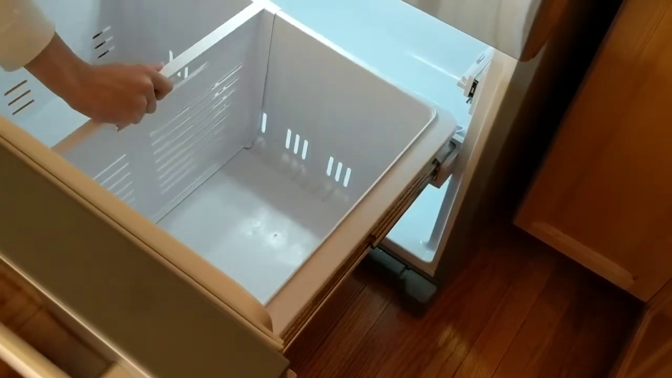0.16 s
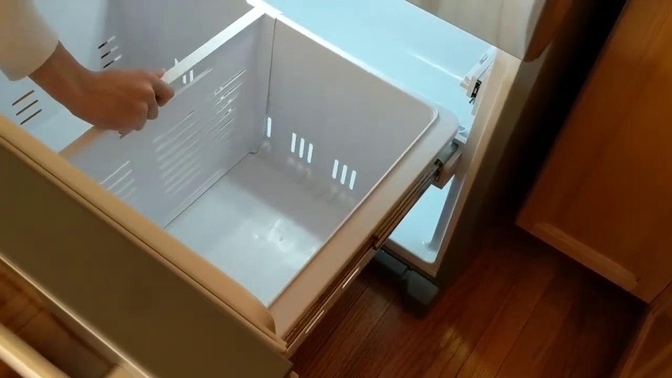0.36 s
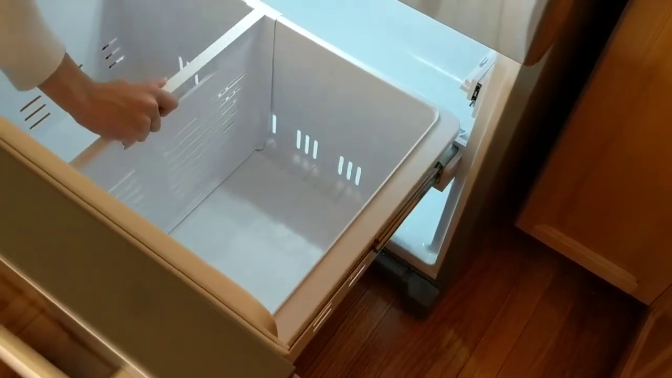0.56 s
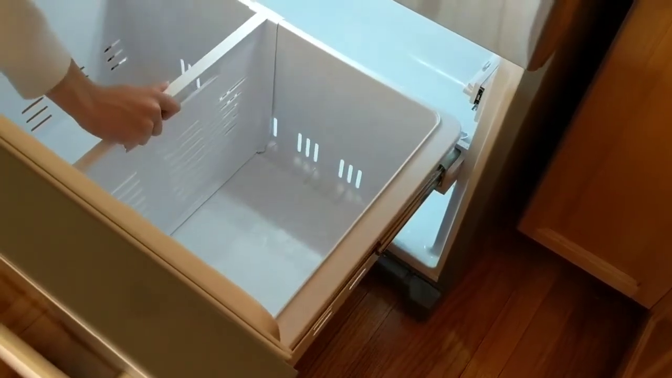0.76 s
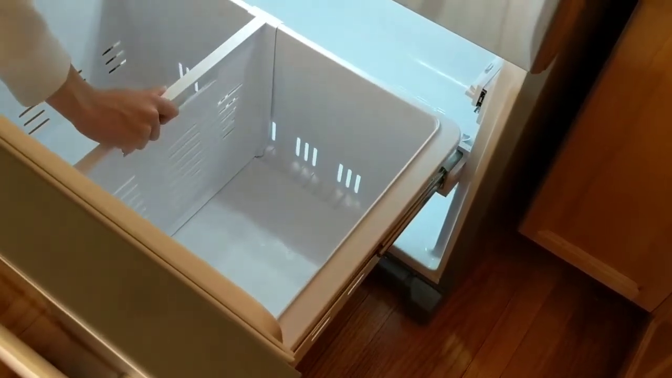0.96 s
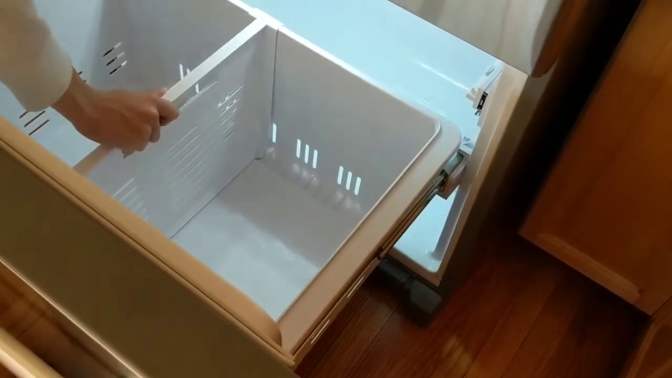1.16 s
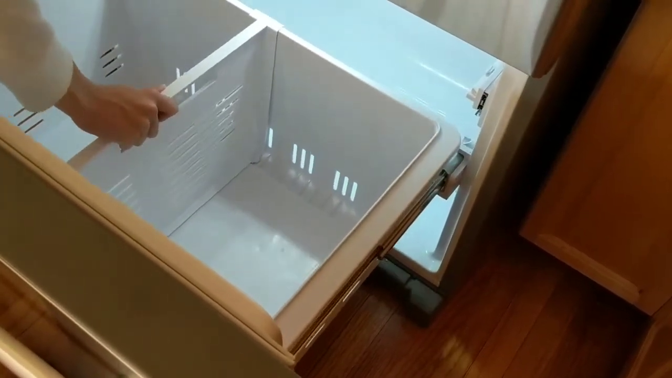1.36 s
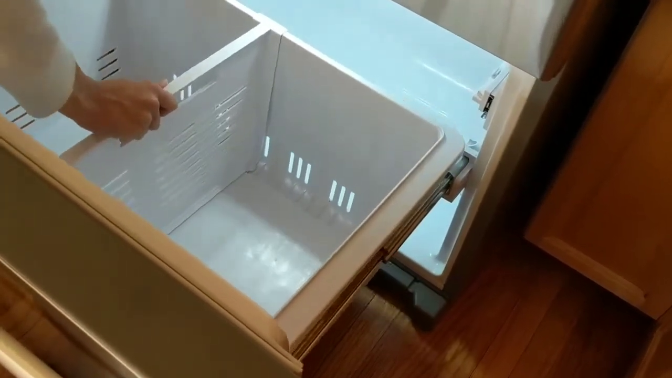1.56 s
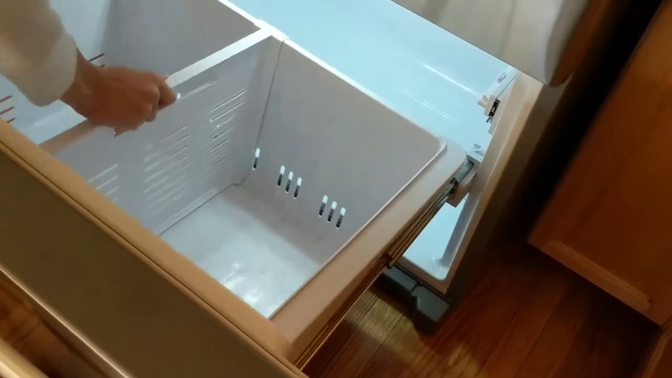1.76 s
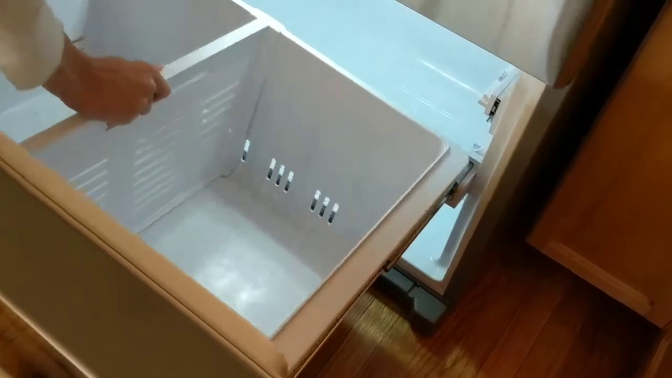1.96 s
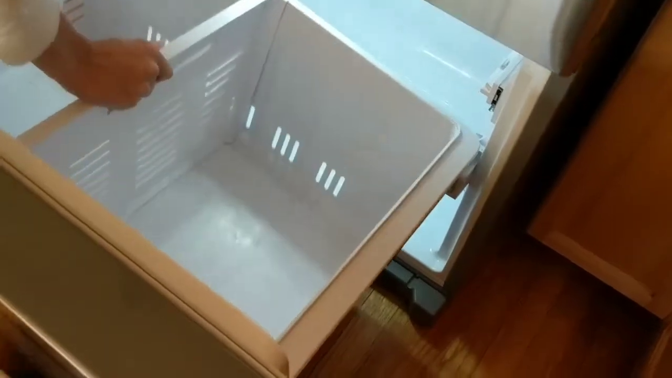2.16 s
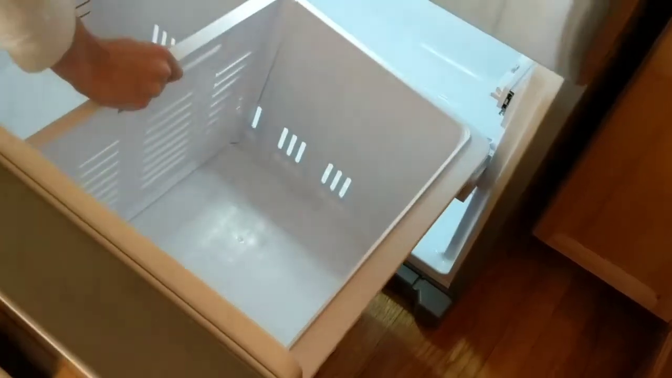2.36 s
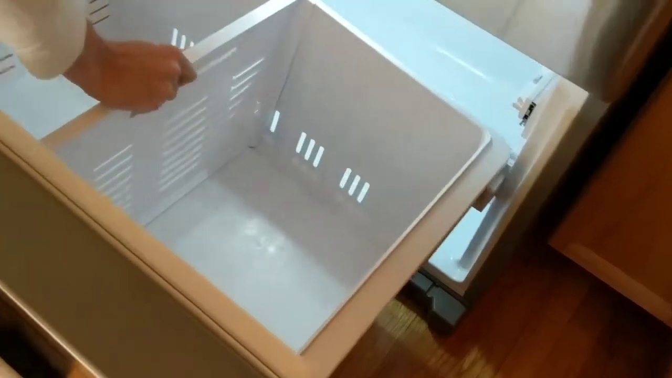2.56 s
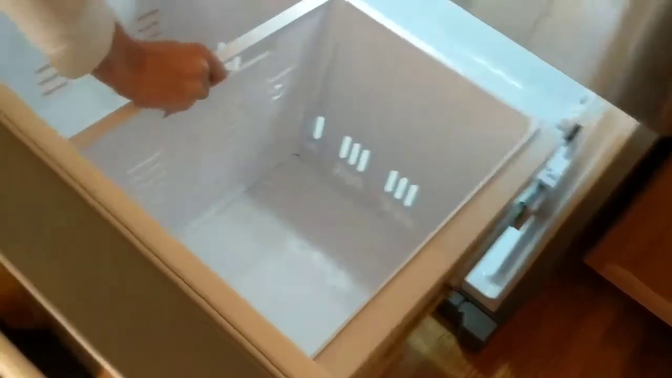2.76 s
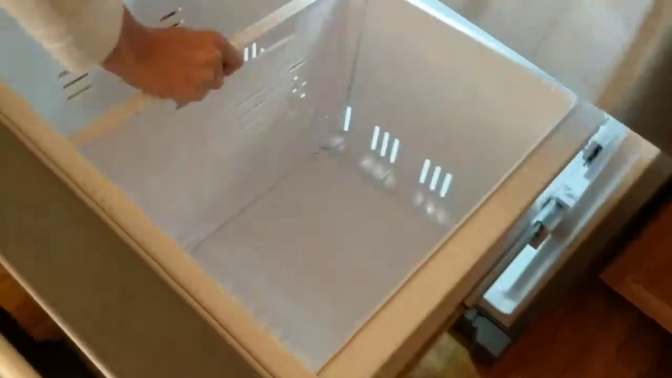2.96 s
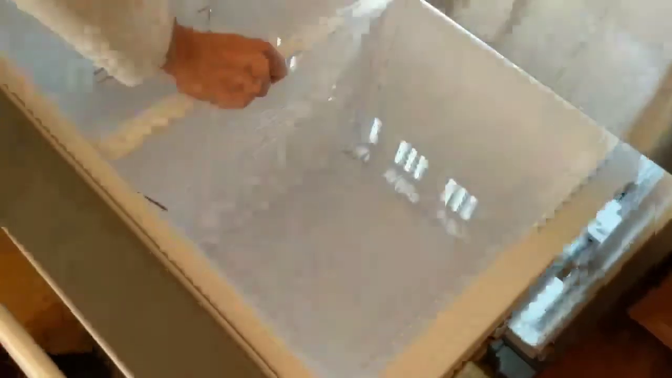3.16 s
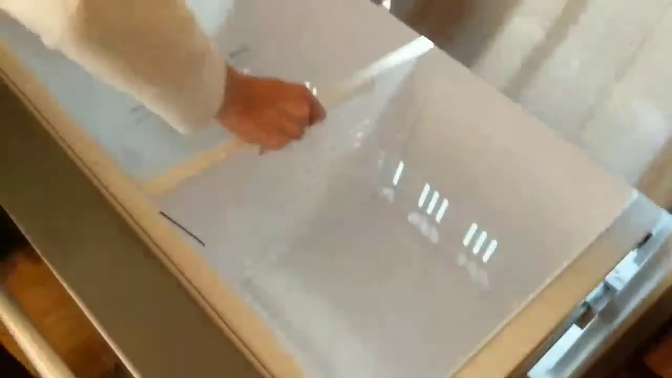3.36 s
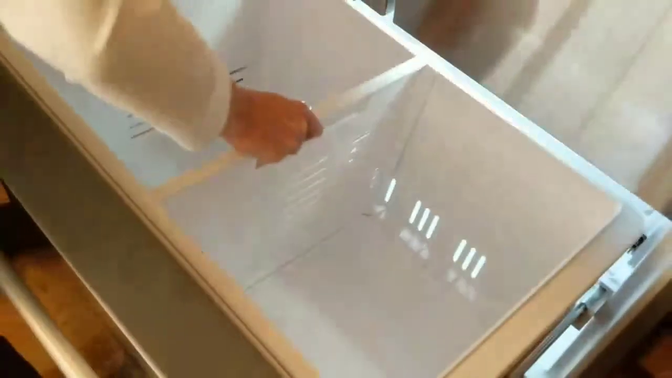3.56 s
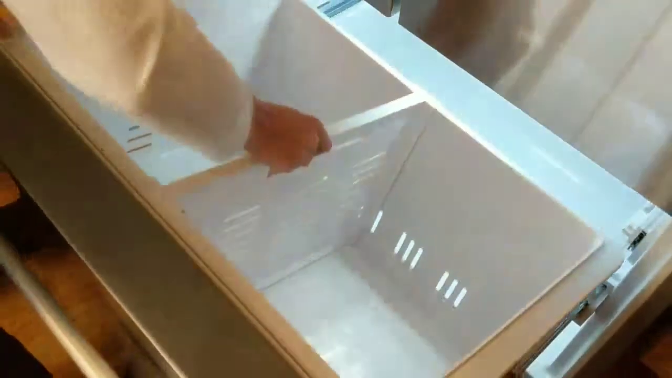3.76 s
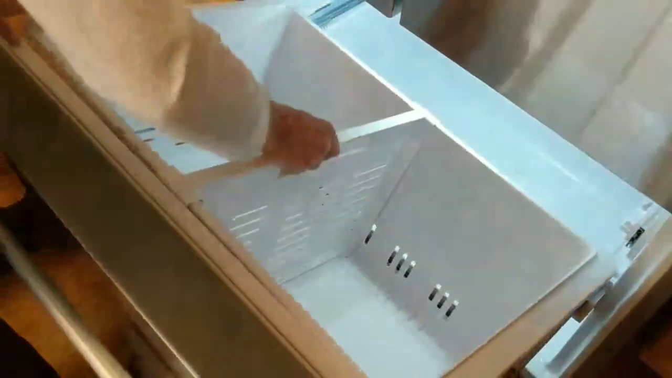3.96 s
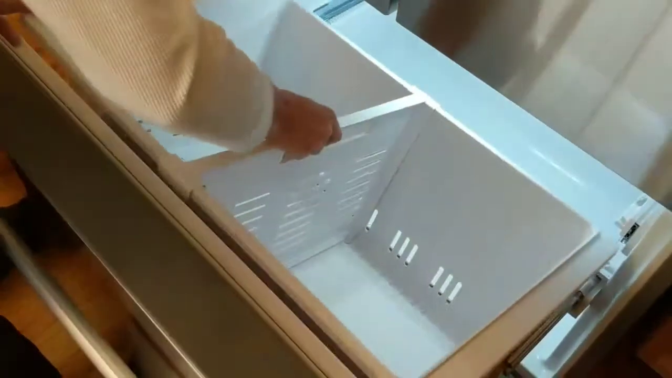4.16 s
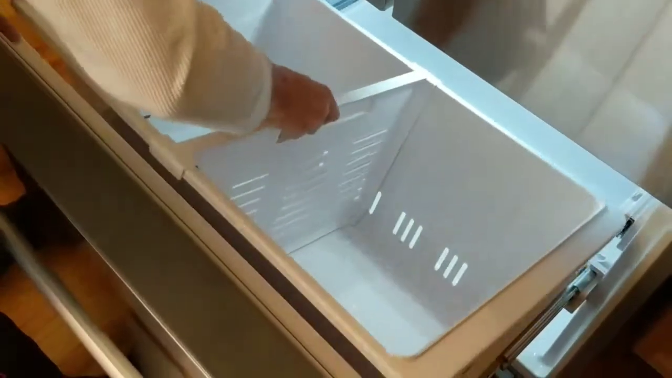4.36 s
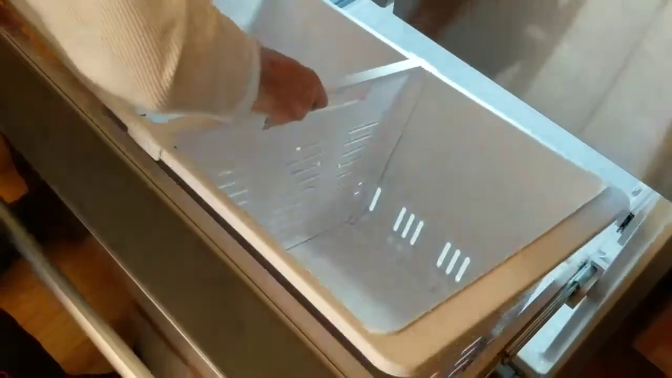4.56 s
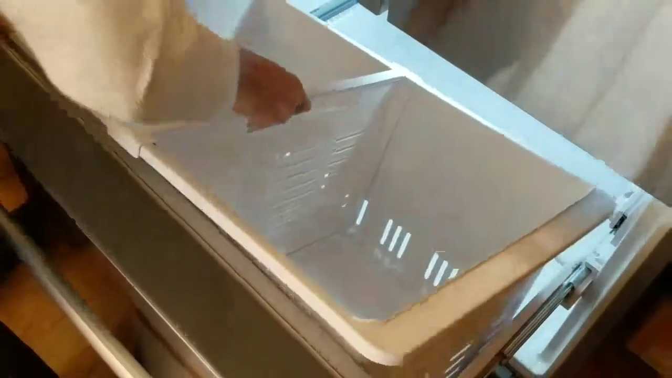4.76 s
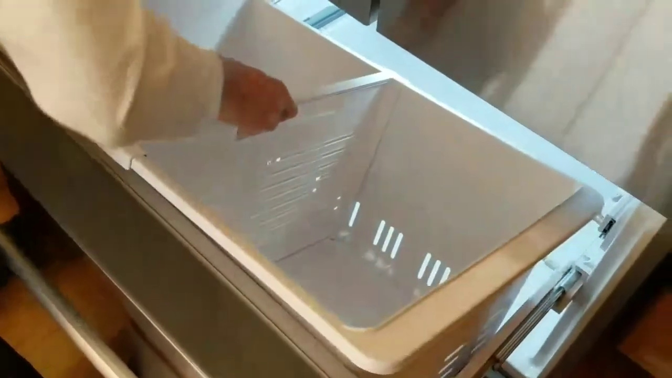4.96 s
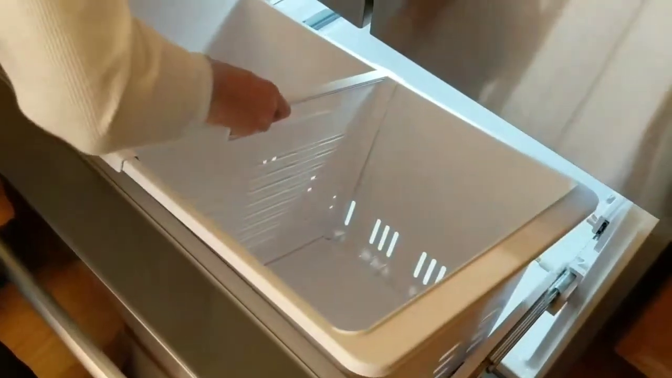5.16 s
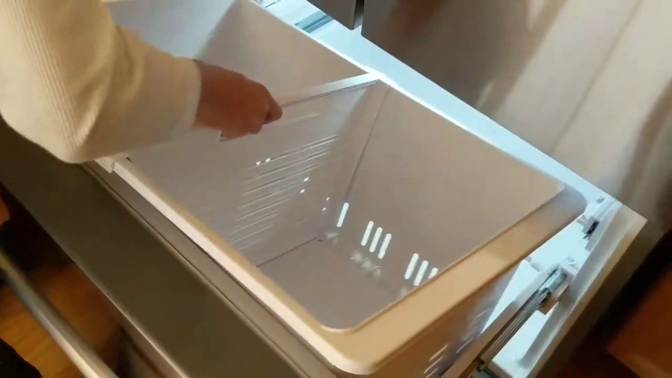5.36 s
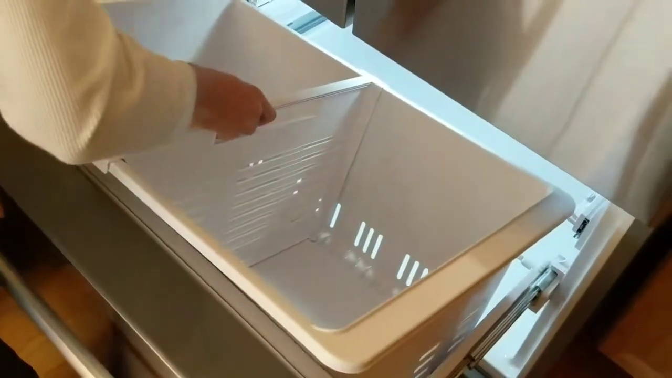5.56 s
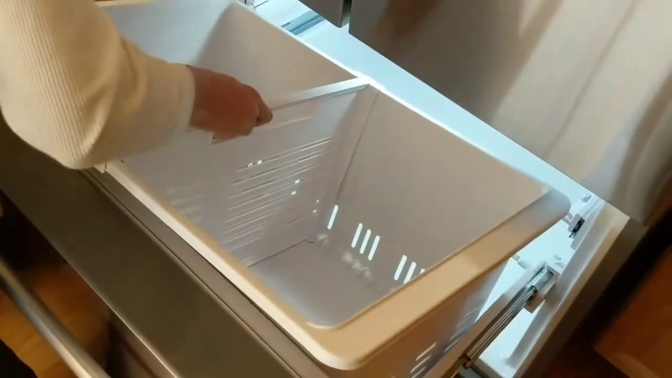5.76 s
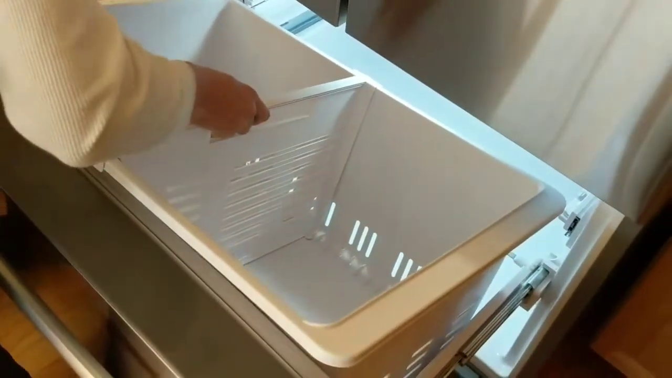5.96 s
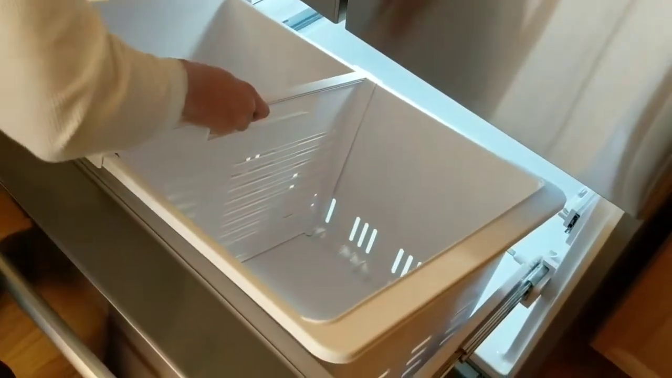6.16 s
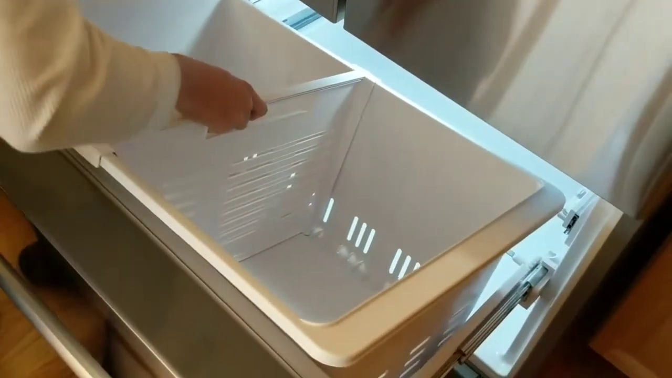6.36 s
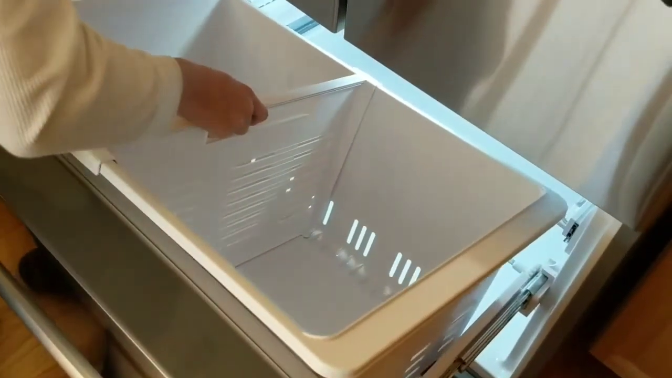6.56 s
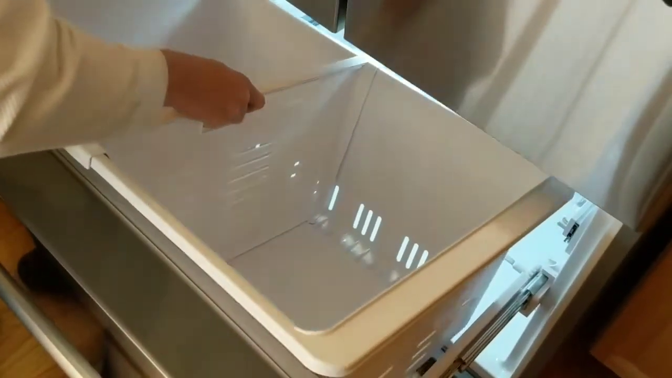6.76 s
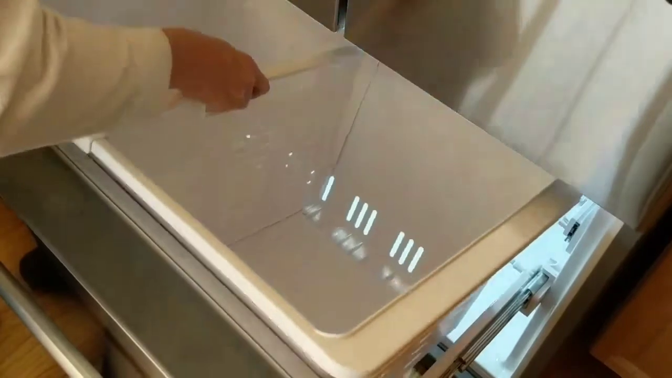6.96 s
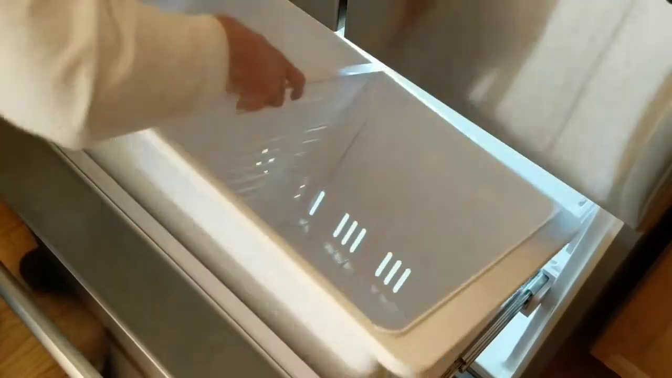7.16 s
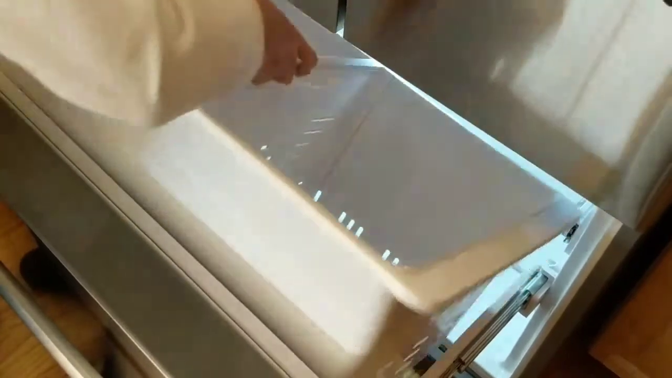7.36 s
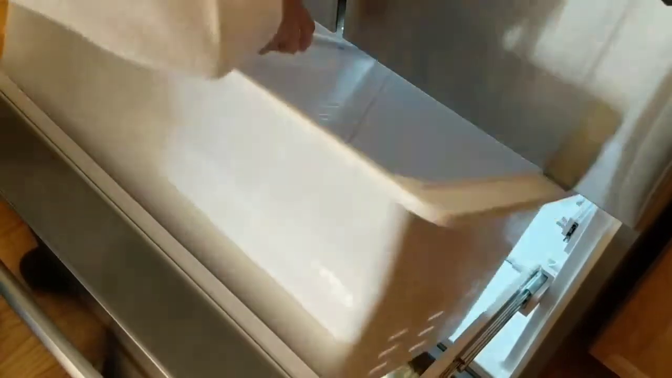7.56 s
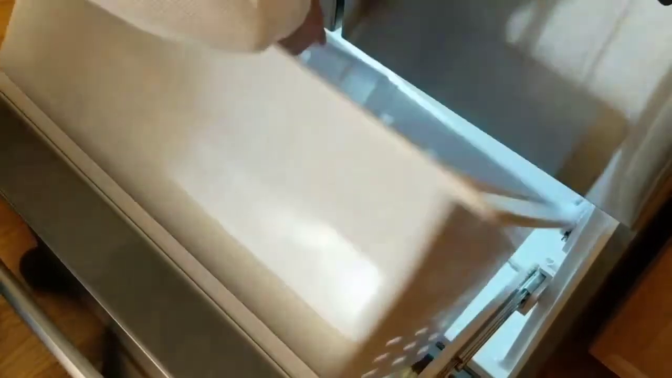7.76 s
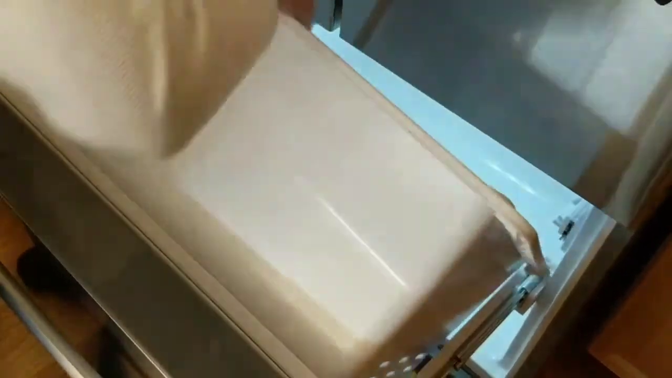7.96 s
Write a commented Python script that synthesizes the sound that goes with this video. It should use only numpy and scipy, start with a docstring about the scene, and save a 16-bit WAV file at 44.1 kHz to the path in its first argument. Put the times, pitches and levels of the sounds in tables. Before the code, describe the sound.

A hollow plastic freezer basket knocks, clacks and rattles against its drawer frame, then thumps and scrapes free, over a faint freezer hum.

```python
"""Kitchen: a plastic freezer basket is jiggled in its drawer frame and finally dragged up and out.
Rim contacts clack as filtered noise; walls, panels and drawer knock as damped modes.
Between them the rim rattles and scrapes along the frame as random jerks through the plastic's resonances.
The freezer hums underneath as wavering sines over filtered noise; the room adds decaying noise echoes."""
import sys
import numpy as np
from scipy import signal
from scipy.fft import rfft, irfft, next_fast_len
from scipy.io import wavfile
from scipy.ndimage import uniform_filter1d, map_coordinates

SR = 44100
rng = np.random.default_rng(int(sys.argv[2]) if len(sys.argv) > 2 else 0)


def store_wav(level_fs):
    """Save 16-bit WAV to argv[1]."""
    pcm = np.round(np.clip(np.atleast_2d(level_fs), -1, 1) * 32767)
    wavfile.write(sys.argv[1], SR, pcm.T.astype(np.int16))


N = 356901

# All table levels are relative: layer trims follow.
# Rim hits frame: (time [s], clack [dB], snap re clack [dB], favoured pitch [Hz], wall knock [dB])
RIM_CONTACTS = [(0.097, -39, -12.5, 807, -31), (0.29, -45.5, -23, 970, -52),
                (0.329, -30.5, -7, 1330, -19.5), (0.573, -49, -11.5, 1270, -41.5),
                (0.715, -44.5, -11, 1680, -32.5), (1.549, -49, -15.5, 1180, -38),
                (1.813, -45, -18, 750, -32), (1.834, -43, -7.5, 830, -52), (1.911, -36.5, -4.5, 980, -30),
                (1.932, -32.5, -15, 780, -24), (2.339, -44, -5.5, 1690, -36.5), (2.39, -44, -22, 850, -40),
                (2.483, -45, -16.5, 830, -41), (2.63, -49.5, -8, 1650, -40.5),
                (2.72, -40.5, -4, 1480, -29.5), (2.844, -42, -11.5, 820, -29.5),
                (2.918, -49, -7, 810, -28.5), (2.957, -41, -7, 1050, -31.5), (3.097, -48, -17, 840, -38),
                (3.552, -43.5, -12, 1170, -41.5), (3.644, -48.5, -10.5, 1010, -45.5),
                (4.024, -47, -8, 1010, -45), (4.045, -38.5, -7.5, 2030, -30),
                (4.053, -36.5, -10, 2200, -33), (4.233, -44.5, -9.5, 1090, -37.5),
                (4.295, -44.5, -11.5, 970, -40), (4.437, -34.5, -9.5, 1460, -23.5),
                (4.496, -33.5, -12, 1550, -26), (4.624, -40.5, -16, 1580, -34),
                (5.057, -57, -14, 950, -53.5), (5.308, -44.5, -10, 1230, -29.5),
                (5.331, -44, -11, 1010, -38.5), (6.251, -45, -10, 1310, -39.5),
                (6.663, -46, -13, 1060, -43.5), (6.704, -45, -9, 1180, -37), (6.79, -39.5, -21, 706, -33),
                (6.872, -39.5, -10, 1670, -36.5), (7.013, -55, 3.5, 2030, -38),
                (7.354, -43, -25, 1020, -29), (7.404, -39.5, -12.5, 1530, -21),
                (7.435, -40, -20, 1210, -29), (7.546, -37, -25, 980, -19), (7.563, -35.5, -14, 1280, -27.5),
                (7.65, -36, 1, 950, -24), (7.661, -39, -4, 985, -30), (7.747, -42, -21, 910, -30),
                (7.976, -57.5, 7.5, 1050, -45.5)]
# Basket belly bumps drawer, no clack: (time [s], walls [dB], drawer boom [dB])
BELLY_BUMPS = [(0.001, -34.5, -34.5), (0.141, -31.5, -42), (0.379, -30, -36), (1.086, -43, -58),
               (1.6, -39, -44), (1.677, -39, -43), (2.357, -43, -31.5), (2.405, -44, -34),
               (2.751, -25.5, -38), (2.789, -32.5, -30.5), (2.948, -25.5, -31), (3.342, -44, -42.5),
               (3.473, -37.5, -40), (3.796, -44.5, -48), (4.653, -37.5, -35), (4.89, -46.5, -55),
               (5.388, -38, -55), (5.451, -43, -58), (6.334, -46.5, -50), (6.892, -33, -27),
               (6.949, -34.5, -39), (7.0, -34.5, -53), (7.599, -21, -38), (7.638, -31, -25),
               (7.794, -27.5, -32), (7.83, -27, -46), (8.003, -37, -31)]
# Rim slides along frame: (start [s], length [s], rasp [dB], hiss [dB])
RIM_SLIDES = [(0.328, 0.0043, -30, -30.5), (1.093, 0.15, -80, -68), (1.939, 0.15, -52, -50.5),
              (2.28, 0.034, -76, -56.5), (2.764, 0.2, -59.5, -80), (5.983, 0.1, -62, -57.5),
              (7.13, 0.029, -64, -52.5), (7.58, 0.062, -50, -55), (7.626, 0.036, -37, -39.5),
              (7.679, 0.2, -48, -60)]
# Rim resonances: (centre [Hz], width [Hz], level [dB])
RIM_RESONANCES = [(950, 30, -14), (1053, 43, -5.5), (1315, 41, -5.5), (1810, 120, -16), (3580, 410, -5.5)]
# Nominal modes of the steel slide rail: (frequency [Hz], level [dB], t60 [s])
RAIL_MODES = [(3350, -3, 0.16), (4520, -12, .2), (5400, -6, 0.095), (5400, -3, 0.16), (5250, 5, 0.092),
              (6120, 8, 0.16), (7250, -6, 0.13), (8720, 6, .15)]
# Nominal modes of basket walls, stiff panels, drawer: (frequency [Hz], level [dB], t60 [s])
WALL_MODES = [(136.8, -5, 0.24), (151.8, -3.5, 0.45), (174, 1, 0.13), (196, -1, 0.26), (214.8, -4.5, 0.24),
              (236.9, 0, 0.21), (265, -3, 0.23), (287.8, -5, 0.12)]
PANEL_MODES = [(339.4, 0, 0.11), (371.6, -3, 0.27), (406.3, -1, .22), (432.4, -6, 0.13), (494.8, -7, 0.16),
               (546.6, -7, 0.14), (605.7, -11, 0.21), (698, -16, 0.17)]
DRAWER_MODES = [(67, 0.5, 0.15), (74.74, -4, 0.29), (91.7, -9.5, 0.14)]
# Spectral colours of clack, snap, rasp, hiss, air rush: (frequency [Hz], gain [dB])
CLACK_COLOUR = [(150, -28), (400, 7), (750, 1.5), (1300, -0.5), (2200, 0), (2900, -10.5), (4500, -16.5),
                (8000, -66)]
SNAP_COLOUR = [(1200, -34), (2600, -20), (3700, 2), (4600, -5), (5800, 2), (7200, -3.5), (8800, 1.5),
               (9700, -9), (10800, -21.5), (15500, -41)]
RASP_COLOUR = [(150, -16), (400, 3), (1000, 5.5), (2100, 2.5), (2900, -20), (6000, -57)]
HISS_COLOUR = [(1500, 2), (3000, 6), (7200, -1), (8800, 3), (9700, -7), (10800, -35), (15500, -37)]
AIR_COLOUR = [(25, -32), (60, -37), (100, -19.5), (300, -24), (450, -29.5), (750, -35), (2100, -36.5),
              (3000, -41.5), (8700, -48), (10000, -54.5), (15600, -58)]
# Compressor and fan partials: (frequency [Hz], rms level before swell [dB])
HUM_PARTIALS = [(60, -51), (123.8, -68.5), (269.2, -74), (430.7, -72.5), (533, -81)]
# Hum swell: (time [s], gain [dB])
HUM_SWELL_CURVE = [(0, 6.5), (1.3, -0.5), (2.3, 3.5), (3.2, 3.5), (3.9, 0.5), (5.0, 1), (6.6, 0.5),
                   (7.15, 4), (7.3, -4.5), (8.09, 6.5)]
# Room decay: (frequency [Hz], t60 [s])
ROOM_DECAY = [(70, 0.53), (250, 0.69), (1500, 0.56), (5000, 0.44), (10000, 0.34)]

TOP_HZ = 15750  # band limit
SLIDE_ATTACK_SHARE, SLIDE_RELEASE_S = 0.55, 0.029  # 20 dB rise (share of slide length), 20 dB fall
WALL_LAG_S = 0.005  # walls bend this long after the rim hit
WALL_HZ, WALL_RISE_HZ_PER_DB = 216, 3.5  # seated basket: harder clack favours higher wall modes
LIFT_S, LIFTED_WALL_HZ = 6.5, 199  # lifted clear: free walls favour lower modes
SNAP_HZ, SNAP_RISE_HZ_PER_DB = 3600, 380  # snap above usual favours higher rim modes
USUAL_CLACK_DB, USUAL_SNAP_DB, USUAL_KNOCK_DB = -42.5, -41, -29  # contact of middling force
BOOM_DB, BOOM_GROWTH_DB_PER_DB = -35.5, 0.8  # drawer boom at usual knock, growth with knock
SOFT_PANEL_DB, SOFT_PANEL_GROWTH_DB_PER_DB = -42.5, 0.71  # same for panels in soft bumps


def clacks(clack_trim_db=-5, snap_trim_db=-4, rail_db=-22, crack_db=-19, clack_t60_s=0.17, snap_t60_s=0.13,
           attack_s=0.0016, softness=0.56, scuff_db=-17, lead_s=0.012):
    """Each contact scuffs, cracks, rings the dense, damped rim modes and faintly the steel rail behind."""
    out = np.zeros(N)
    before_s = np.arange(SR // 3) / SR - lead_s  # negative ahead of contact
    t_s = np.maximum(before_s, 0)
    scuff = amp(scuff_db) * (before_s < 0) * (1 + before_s / lead_s)  # parts graze before they catch
    bounce = 1 + amp(6.5 - 60 * t_s / 0.035)
    for time_s, contact_db, treble_db, clack_hz, _ in RIM_CONTACTS:
        clack_noise, snap_noise, crack_noise = rng.standard_normal((3, len(t_s)))
        snap_excess_db = max(contact_db + treble_db - USUAL_SNAP_DB, 0)
        snap_hz = SNAP_HZ + SNAP_RISE_HZ_PER_DB * snap_excess_db

        # a light touch closes more slowly than a hard one
        closing_s = attack_s * amp(-softness * (contact_db - USUAL_CLACK_DB))
        rise = 1 - np.exp(-t_s / closing_s)
        rebounds = chatter(len(t_s), depth_db=1.5) * (scuff + rise * bounce)

        clack = unit(filtered(clack_noise, lambda hz: plastic(CLACK_COLOUR, hz)
                              * favoured(hz, clack_hz, octaves=0.25, lift_db=7)))
        clack = amp(clack_trim_db - 60 * t_s / clack_t60_s) * clack
        snap = unit(filtered(snap_noise, lambda hz: plastic(SNAP_COLOUR, hz)
                             * favoured(hz, snap_hz, octaves=0.29, lift_db=3.5)))
        snap = amp(snap_trim_db - 60 * t_s / snap_t60_s) * snap
        crack = amp(crack_db - 60 * t_s / 0.012) * rise * crack_noise
        rail = amp(rail_db) * ringing(RAIL_MODES, t_s, attack_s=0.001, centre_hz=snap_hz,
                                      scatter_db=5, detune_share=0.003)
        treble = rebounds * snap + crack + rail
        add(out, time_s - lead_s, amp(contact_db) * (rebounds * clack + amp(treble_db) * treble))
    return out


def chatter(samples, depth_db):
    """Uneven gain of parts that rebound on each other every two milliseconds or so."""
    knots = np.arange(0, samples, 88)
    return amp(depth_db * np.interp(np.arange(samples), knots, rng.standard_normal(len(knots))))


def knocks(hard_panel_db=0.0):
    """The body answers every rim contact, panels following the clack; soft bumps hardly stir the panels."""
    out = np.zeros(N)
    for time_s, clack_db, _, _, wall_db in RIM_CONTACTS:
        boom_db = BOOM_DB + BOOM_GROWTH_DB_PER_DB * (wall_db - USUAL_KNOCK_DB)
        seated_hz = WALL_HZ + WALL_RISE_HZ_PER_DB * (clack_db - USUAL_CLACK_DB)
        centre_hz = seated_hz if time_s < LIFT_S else LIFTED_WALL_HZ
        add(out, time_s + WALL_LAG_S, blow(wall_db, boom_db, clack_db + hard_panel_db, centre_hz))
    for time_s, wall_db, boom_db in BELLY_BUMPS:
        panel_db = SOFT_PANEL_DB + SOFT_PANEL_GROWTH_DB_PER_DB * (wall_db - USUAL_KNOCK_DB)
        centre_hz = WALL_HZ if time_s < LIFT_S else LIFTED_WALL_HZ
        add(out, time_s, blow(wall_db, boom_db, panel_db, centre_hz))
    return out


def blow(wall_db, boom_db, panel_db, centre_hz, wall_trim_db=-5, boom_trim_db=-5, panel_trim_db=-5):
    """A blow bends the basket's walls and stiff panels; the heavy drawer booms more slowly."""
    t_s = np.arange(SR // 2) / SR
    walls = ringing(WALL_MODES, t_s, attack_s=0.0013, centre_hz=centre_hz)
    drawer = ringing(DRAWER_MODES, t_s, attack_s=0.011)
    panels = ringing(PANEL_MODES, t_s, attack_s=0.0017)
    return (amp(wall_trim_db + wall_db) * walls
            + amp(boom_trim_db + boom_db) * drawer
            + amp(panel_trim_db + panel_db) * panels)


def ringing(modes, t_s, attack_s, centre_hz=None, scatter_db=2.0, detune_share=0.016):
    """Damped modes; the changing grip shifts their strength and pitch a little at every blow."""
    hz, db, t60_s = np.transpose(modes)[:, :, None]
    level, shift, phase_rad = rng.standard_normal((3, len(modes), 1))
    gain = amp(db + scatter_db * level)
    if centre_hz:
        gain = gain * favoured(hz, centre_hz, octaves=0.24, lift_db=7)
    sines = np.sin(2 * np.pi * (hz * (1 + detune_share * shift) * t_s + phase_rad / (2 * np.pi) * 2 * np.pi))
    waves = gain * amp(-60 * t_s / t60_s) * sines
    return struck(waves.sum(0) * (1 - np.exp(-t_s / attack_s)), samples=1200)


def rattle(body, rattle_db=-25, bright_db=-15, t60_s=0.04):
    """While the walls shake, the loose rim keeps tapping the frame: the wider the swing, the louder."""
    swing = np.sqrt(abs(uniform_filter1d(body ** 2, size=1500)))  # running rms
    t_s = np.arange(SR // 20) / SR
    hits = abs(slips(rate_hz=150, spread_db=1.5))
    envelope = signal.fftconvolve(hits, amp(-60 * t_s / t60_s))[:N]
    taps = envelope * rng.standard_normal(N)
    ring = filtered(taps, lambda hz: plastic(CLACK_COLOUR, hz) + amp(bright_db) * plastic(SNAP_COLOUR, hz))
    return amp(rattle_db) * swing * unit(ring)


def scrapes(rasp_trim_db=-1, hiss_trim_db=-1):
    """The sliding rim catches and lets go under uneven pressure, exciting the same plastic."""
    rasp_press, hiss_press = sum(amp(levels_db)[:, None] * stroke(start_s, length_s)
                                 for start_s, length_s, *levels_db in RIM_SLIDES)
    unevenness = amp(2.0 * wobble(110) + 2.64 * wobble(35))
    jerks = slips(rate_hz=3000, spread_db=0) * unevenness
    rasp = amp(rasp_trim_db) * unit(filtered(jerks, lambda hz: plastic(RASP_COLOUR, hz)))
    hiss = amp(hiss_trim_db) * unit(filtered(jerks, lambda hz: plastic(HISS_COLOUR, hz)))
    return rasp_press * rasp + hiss_press * hiss


def stroke(start_s, length_s):
    """Pressure of one slide: swells ahead of the start, holds for the length, lets go."""
    t_s = np.arange(N) / SR - start_s
    swell = np.maximum(-t_s, 0) / (SLIDE_ATTACK_SHARE * length_s)
    release = np.maximum(t_s - length_s, 0) / SLIDE_RELEASE_S
    return amp(-20 * (swell + release))


def slips(rate_hz, spread_db):
    """Tiny stick-slip jerks at random moments and of uneven size."""
    moments = rng.random(N) < rate_hz / SR
    return moments * rng.standard_normal(N) * amp(spread_db * rng.standard_normal(N))


def freezer(air_db=-61):
    """Compressor and fan hum, now louder and now softer, over a soft rush of air."""
    t_s = np.arange(N) / SR
    hum = np.zeros(N)
    for hz, db in HUM_PARTIALS:
        level = amp(db + 0.4 * wobble(3)) * np.sqrt(2)  # rms to peak
        hum += level * np.sin(2 * np.pi * hz * t_s + 0.3 * wobble(2))
    swell = amp(np.interp(t_s, *np.transpose(HUM_SWELL_CURVE)))
    rush = filtered(rng.standard_normal(N), lambda hz: amp(along(AIR_COLOUR, hz)))
    return hum * swell + amp(air_db) * unit(rush)


def kitchen(x, onset_s=0.0011):
    """Room answer: each frequency dies at its own speed; each moment of the moving basket meets new echoes."""
    out, step = np.zeros(N), SR // 3
    for start in range(0, N, step):
        hz, t_s, bins = signal.stft(rng.standard_normal(SR), SR, nperseg=256)
        decay = amp(-60 * t_s / along(ROOM_DECAY, hz)[:, None])
        tail = signal.istft(bins * decay, SR, nperseg=256)[1]
        tail = tail * (1 - np.exp(-np.arange(len(tail)) / (SR * onset_s)))
        moment = np.clip(1 - abs(np.arange(N) - start) / step, 0, 1) ** 0.5  # crossfade
        first = max(start - step, 0)
        source = (x * moment)[first:start + step]
        add(out, first / SR, signal.fftconvolve(source, tail / np.linalg.norm(tail)))
    return out


def plastic(colour, hz, dense_db=-4):
    """A colour with the rim's resonances standing out of a bed of dense modes."""
    power = sum(amp(db) ** 2 / (1 + (2 * (hz - centre_hz) / width_hz) ** 2)
                for centre_hz, width_hz, db in RIM_RESONANCES)
    return amp(along(colour, hz)) * np.sqrt(power + amp(dense_db) ** 2)


def favoured(hz, centre_hz, octaves, lift_db):
    """The spot that is struck favours the modes near one frequency."""
    distance = np.log2((hz + 1) / centre_hz) / octaves
    return amp(lift_db * np.exp(-0.5 * distance ** 2))


def amp(db):
    """Decibels to gain."""
    return 10 ** (np.asarray(db) / 20)


def unit(x):
    """x at rms 1."""
    return x / np.sqrt(np.mean(x ** 2) + 1e-20)


def struck(x, samples):
    """x scaled to rms 1 over its first samples."""
    return x / np.sqrt(np.mean(x[:samples] ** 2) + 1e-20)


def along(points, hz):
    """(frequency [Hz], value) points read on a log frequency axis."""
    f_hz, value = np.transpose(points)
    return np.interp(np.log(hz + 1), np.log(f_hz + 1), value)


def wobble(rate_hz):
    """Smooth random curve, rate_hz knots a second."""
    knots = rng.standard_normal(int(N * rate_hz / SR) + 4)
    return map_coordinates(knots, [np.arange(N) * rate_hz / SR])


def filtered(x, gain):
    """x times a gain that depends on frequency."""
    m = next_fast_len(len(x) + 4096)
    return irfft(rfft(x, m) * gain(np.fft.rfftfreq(m, 1 / SR)), m)[:len(x)]


def add(track, time_s, sound):
    """Mix a sound into the track."""
    start = max(round(time_s * SR), 0)
    part = track[start:start + len(sound)]
    part += sound[:len(part)]


def scene(rim_room_db=-8, body_room_db=-9):
    """Basket and freezer close by, the kitchen around the basket."""
    body = knocks()
    rim = clacks() + scrapes() + rattle(body)
    room = kitchen(amp(rim_room_db) * rim + amp(body_room_db) * body)
    return (rim + body + room + freezer())[None]


def record(dry):
    """The microphone sheds the deepest bass; nothing is kept above the band limit."""
    highpass = signal.butter(3, 45, "high", fs=SR, output="sos")
    thin = signal.sosfilt(highpass, dry[0])
    return filtered(thin, lambda hz: hz < TOP_HZ)[None]


dry = scene()
out = record(dry)
store_wav(out)
```